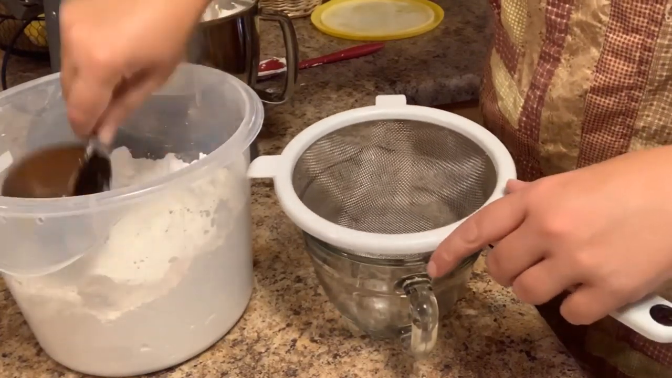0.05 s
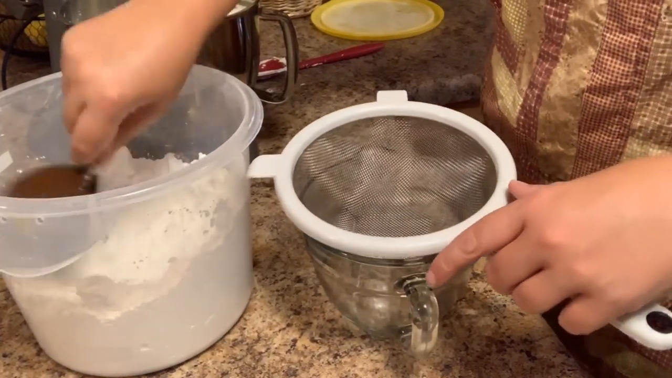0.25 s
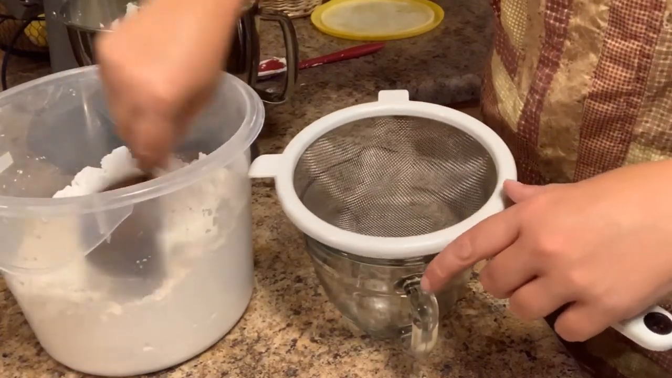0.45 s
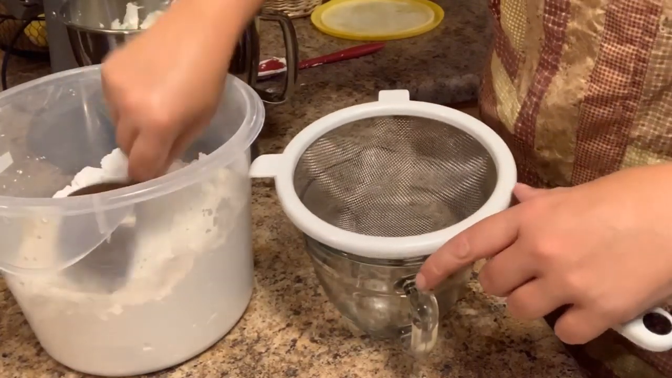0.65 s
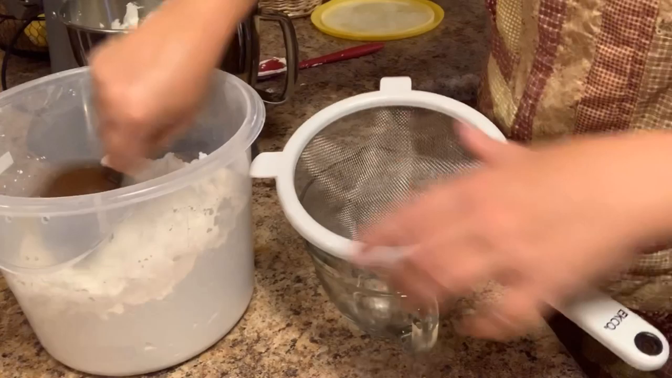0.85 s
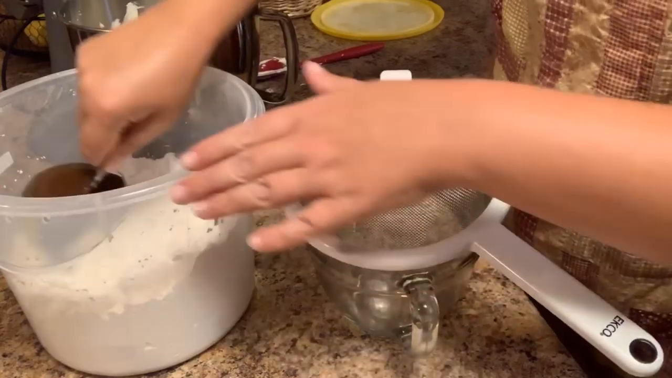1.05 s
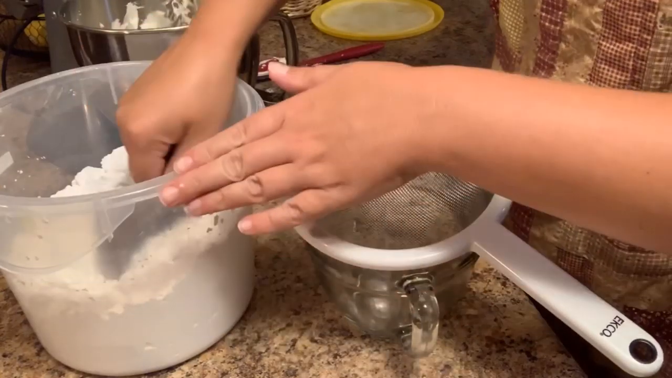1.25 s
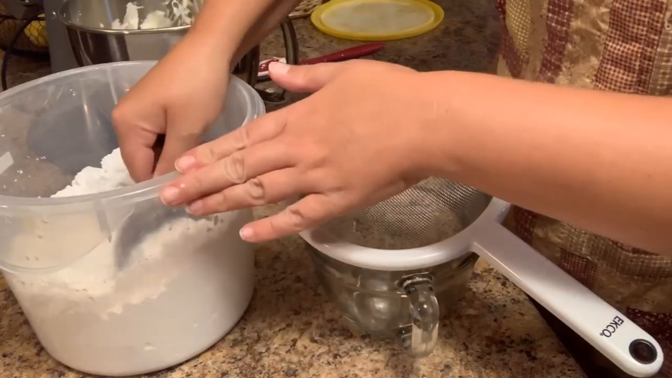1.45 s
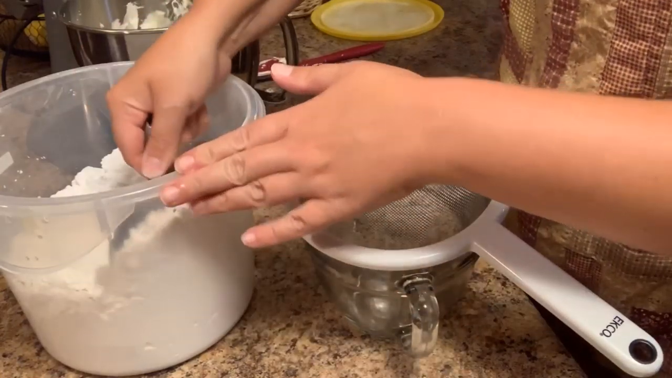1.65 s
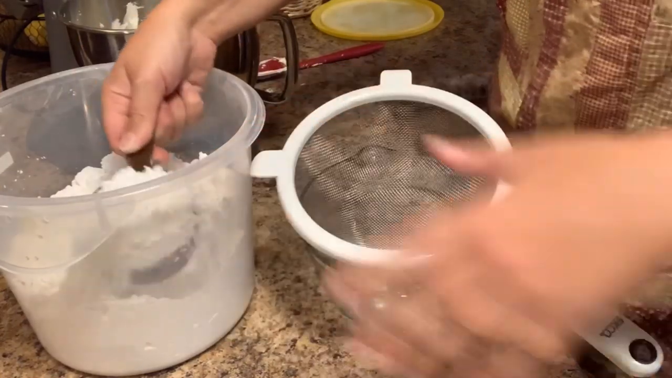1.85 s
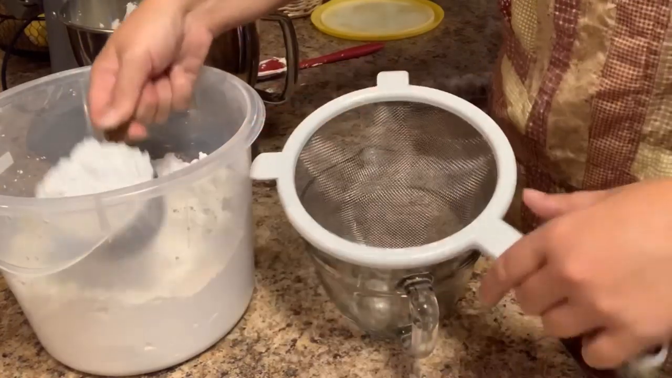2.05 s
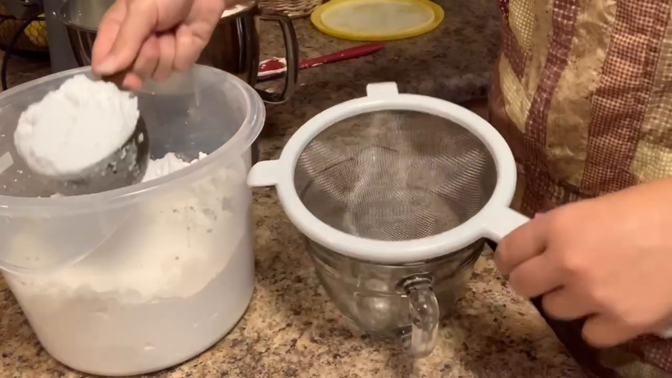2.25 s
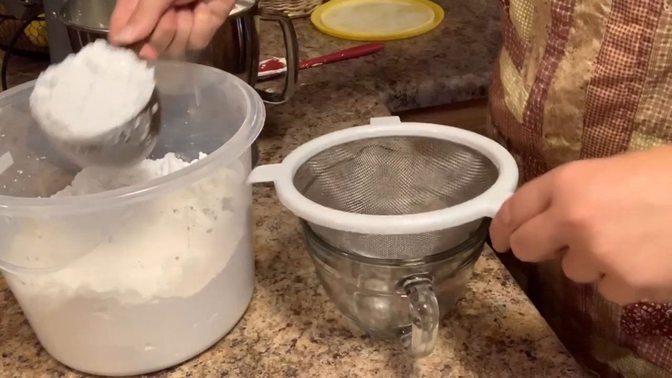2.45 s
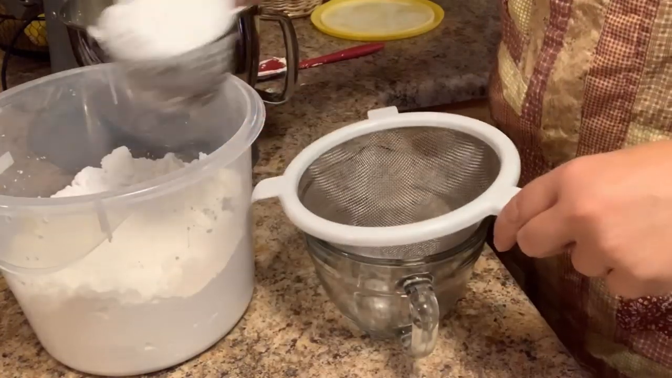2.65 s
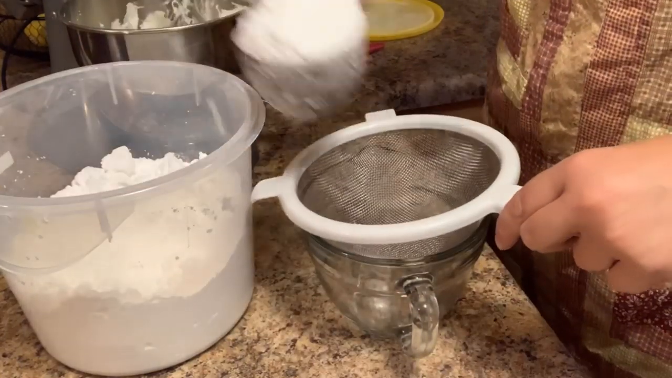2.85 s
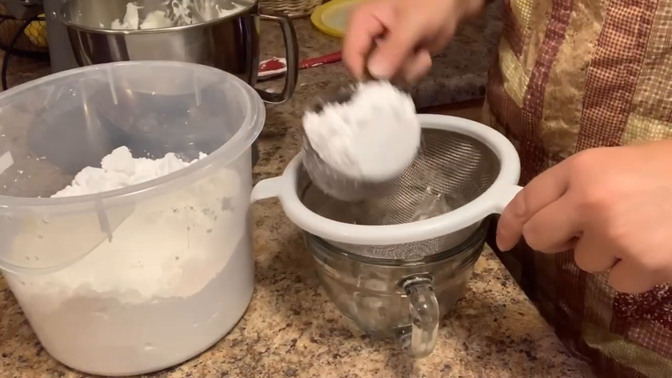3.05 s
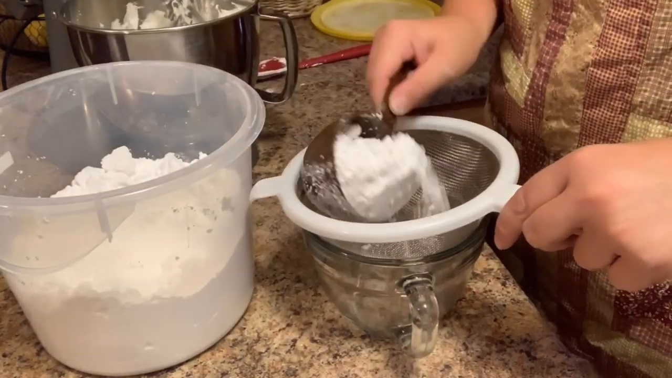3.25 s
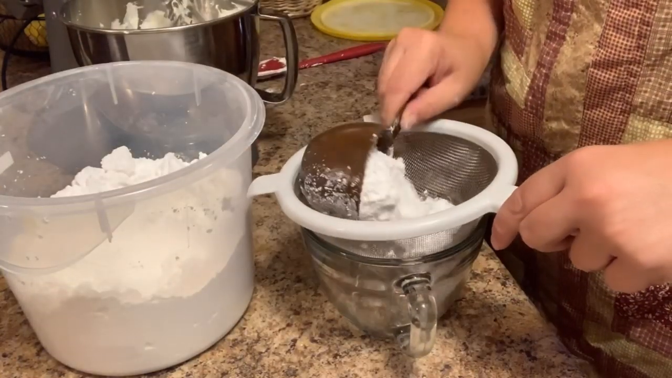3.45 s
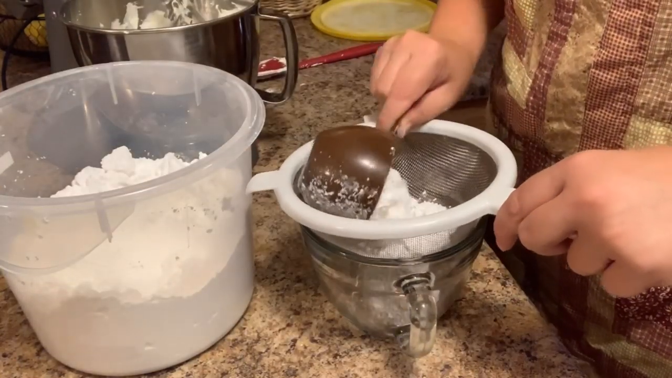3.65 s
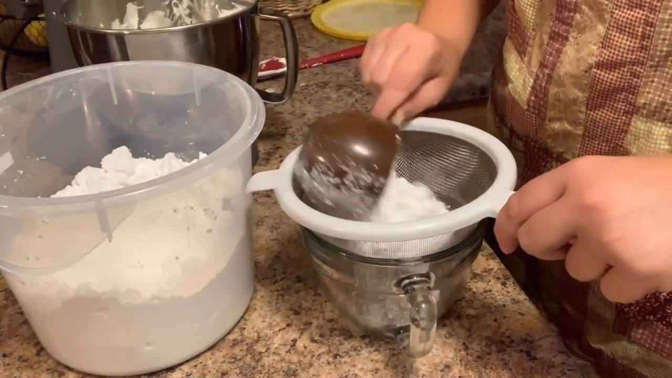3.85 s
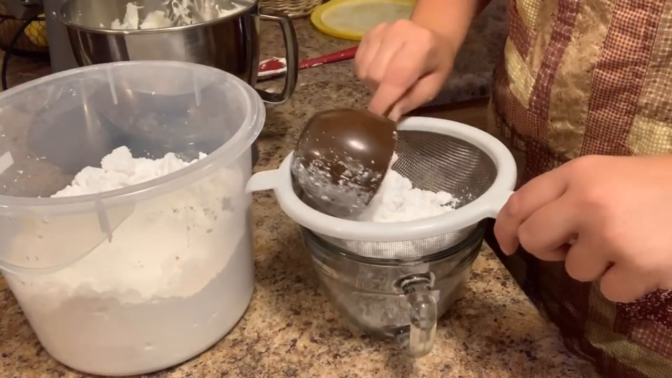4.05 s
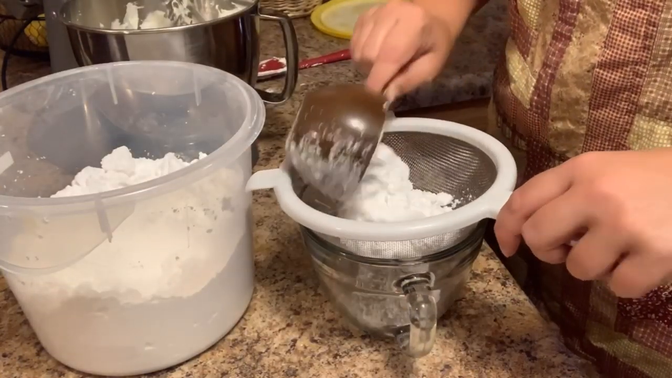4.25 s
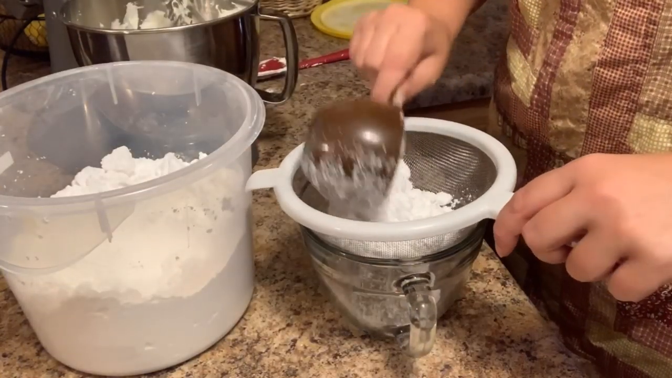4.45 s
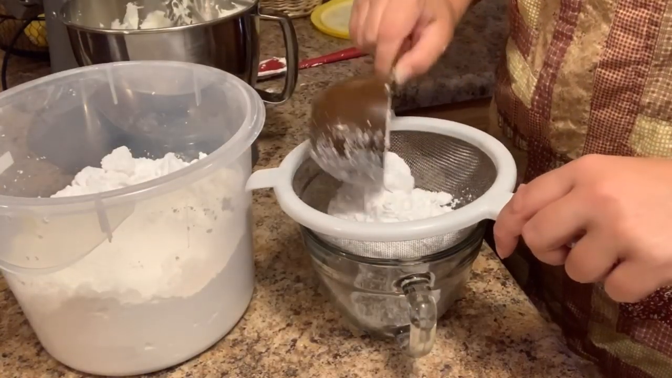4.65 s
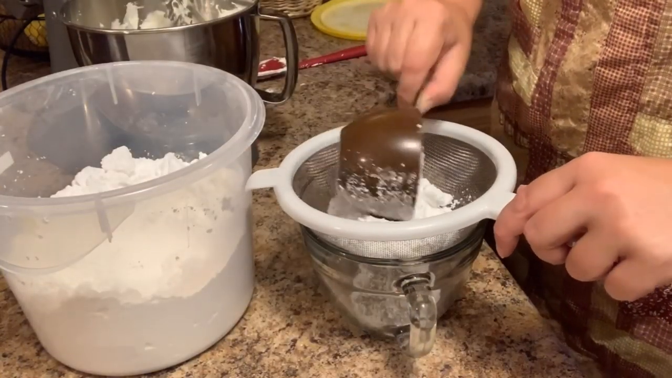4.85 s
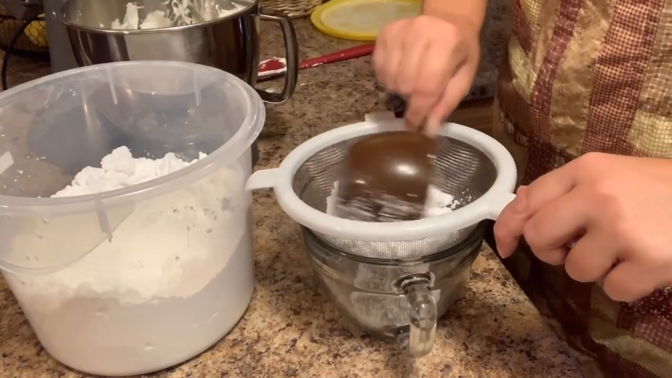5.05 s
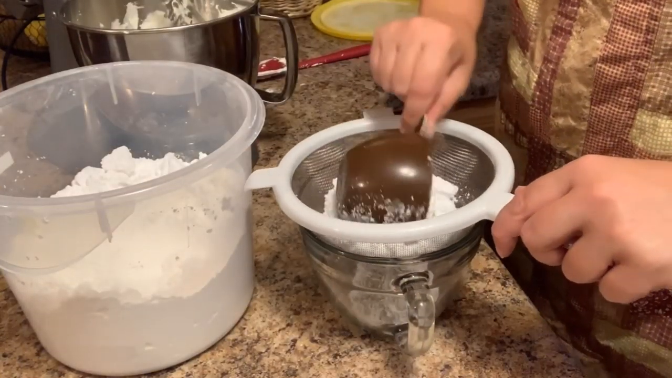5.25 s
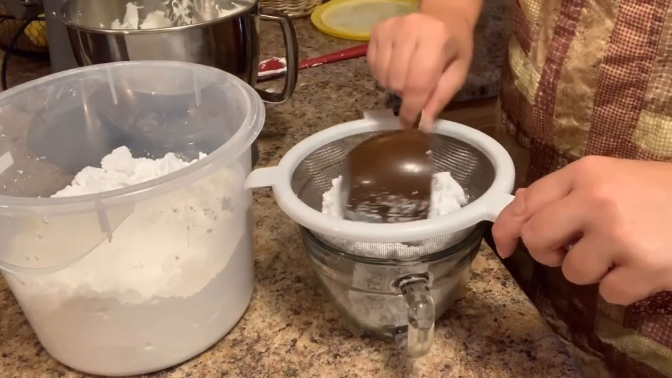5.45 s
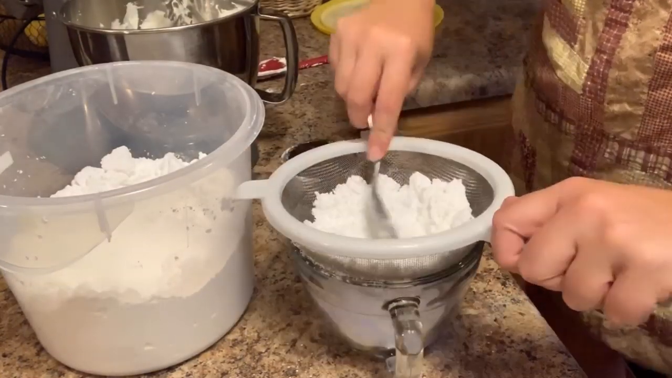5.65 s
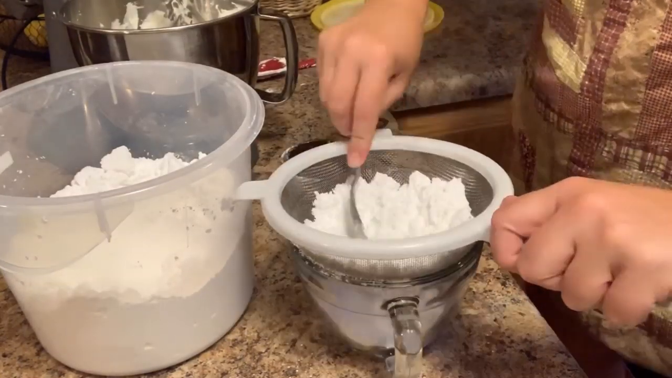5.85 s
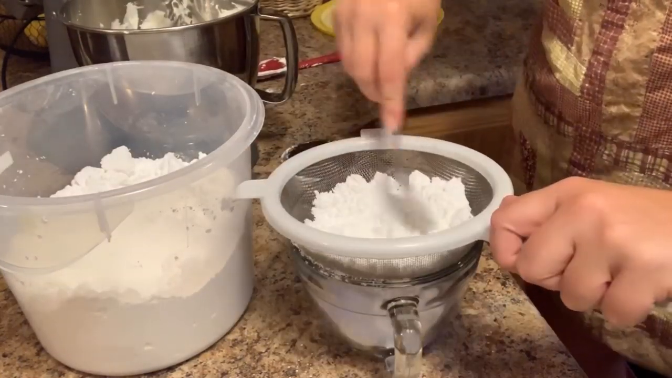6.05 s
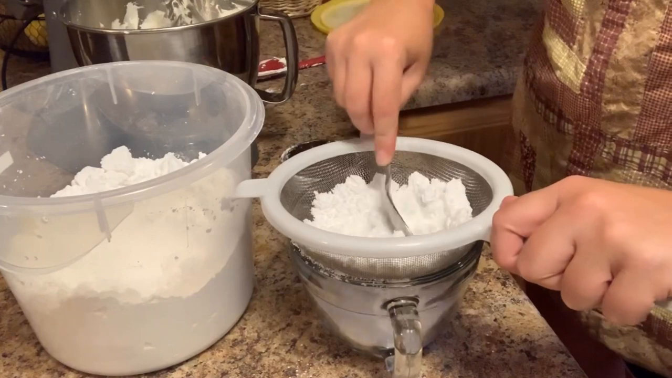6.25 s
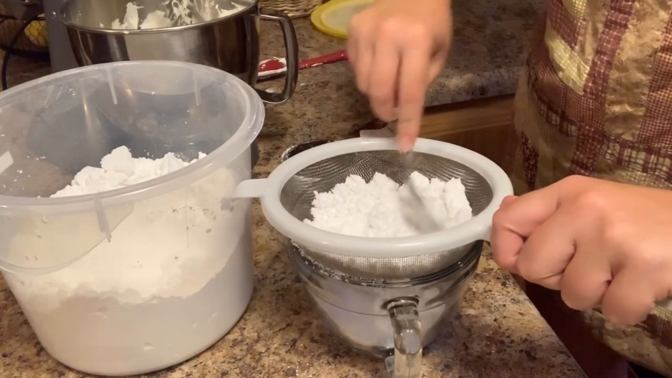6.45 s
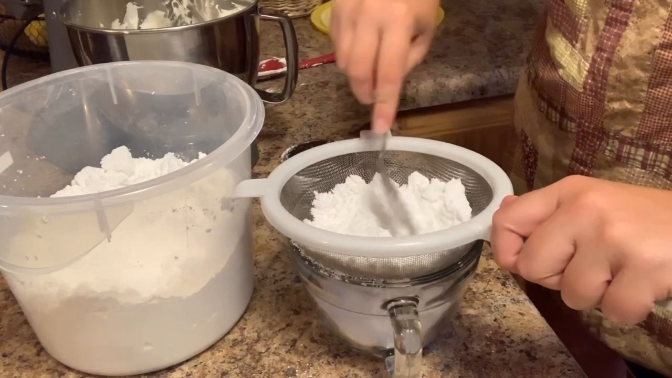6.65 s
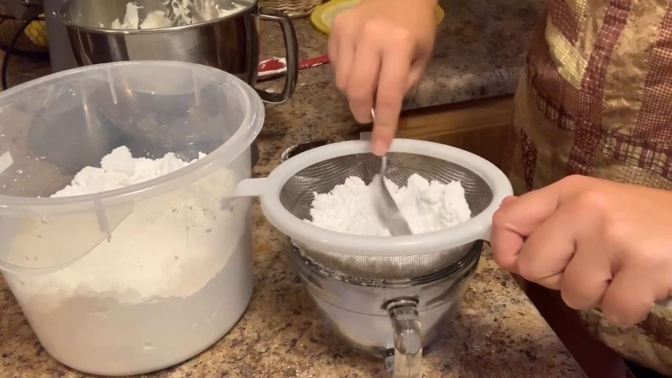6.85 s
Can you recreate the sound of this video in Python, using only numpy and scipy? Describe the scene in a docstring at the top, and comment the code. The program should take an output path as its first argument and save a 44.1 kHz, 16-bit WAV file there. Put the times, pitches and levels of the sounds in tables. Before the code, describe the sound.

Close up in a small kitchen, a plastic cup digs through powdered sugar in a plastic tub with hissing, scuffing strokes and dull bumps. It lifts, then lands on a wire sieve over a glass bowl with one loud knock. Quiet settling and faint taps follow, then firmer knocks and brisk spoon scrapes across the mesh. A faint appliance hum lies behind.

```python
"""First a low rumble and a faint hiss: a plastic cup is already digging powdered sugar out of a tub.
Then it dumps into a wire sieve on a glass bowl, and a spoon works it through the mesh. Heard close in
a small kitchen, in stereo: filtered random slips make the hiss, scuff and rasp; slips and knocks ring
tub and sieve modes, sliding friction makes the glass sing faintly, noise bursts make dry ticks. Behind
them lie an appliance hum (a wavering sine), steady air noise and a dull tail off the walls."""
import sys
import numpy as np
from scipy import signal
from scipy.fft import rfft, irfft, next_fast_len
from scipy.io import wavfile

SR = 44100
rng = np.random.default_rng(int(sys.argv[2]) if len(sys.argv) > 2 else 0)


def wav_out(sig):
    """Save sig, one row per channel (or a flat mono array), as 16-bit PCM at SR to the path in sys.argv[1]."""
    wavfile.write(sys.argv[1], SR, np.round(np.clip(np.atleast_2d(sig).T, -1, 1) * 32767).astype(np.int16))


N = 305017  # length in samples

# Strokes of cup, then spoon, through the powder: start t/s, swell t/s, hold t/s,
# powder hiss level/dB, edge scuff level/dB, shell rasp level/dB, body rumble level/dB
STROKES = [(-0.055, 0.065, 0.028, -62, -74.5, -67, -54), (0.206, 0.0012, 0.025, -58.5, -65, -56.5, -42.5),
           (0.407, 0.0014, 0.033, -54.5, -62, -57.5, -55.5),
           (0.452, 0.026, 0.036, -55.5, -66.5, -57.5, -49.5),
           (0.68, 0.0015, 0.0054, -57, -87, -60.5, -42.5), (0.694, 0.037, 0.026, -58, -74, -57.5, -58),
           (0.856, 0.014, 0.029, -63, -70, -69, -61.5), (0.883, 0.098, 0.018, -56.5, -65.5, -56.5, -55),
           (1.056, 0.044, 0.04, -58.5, -96, -68, -68), (1.15, 0.11, 0.0068, -54.5, -71.5, -56, -59.5),
           (1.292, 0.029, 0.14, -68.5, -86, -68.5, -59.5), (1.436, 0.077, 0.42, -64, -72.5, -72.5, -71.5),
           (1.792, 0.0013, 0.062, -58, -58, -77, -68), (1.853, 0.043, 0.0046, -56, -56, -75, -58),
           (1.993, 0.053, 0.15, -84, -80, -76.5, -65.5), (2.141, 0.0066, 0.036, -65, -70.5, -61.5, -58),
           (2.168, 0.044, 0.035, -66, -75, -74, -54), (2.322, 0.021, 0.03, -68.5, -74, -71, -55.5),
           (2.378, 0.0087, 0.12, -57, -66, -65.5, -50.5), (2.607, 0.049, 0.029, -54, -63.5, -73, -45.5),
           (2.733, 0.021, 0.017, -72, -75, -71, -65), (2.904, 0.06, 0.059, -87, -92, -74, -76),
           (3.084, 0.012, 0.037, -77.5, -80, -79.5, -67.5), (3.283, 0.0012, 0.0036, -53, -65, -50, -62),
           (3.303, 0.0038, 0.0085, -59.5, -55.5, -38.5, -26.5),
           (3.365, 0.0016, 0.051, -60.5, -67, -56.5, -58), (3.448, 0.015, 0.086, -64, -67, -60, -57.5),
           (3.574, 0.017, 0.2, -79.5, -84.5, -81, -54), (3.809, 0.0023, 0.012, -67, -79, -67, -49.5),
           (3.837, 0.022, 0.034, -72.5, -85, -88, -52.5), (3.92, 0.0052, 0.089, -75, -88, -90, -56),
           (4.027, 0.0016, 0.006, -74.5, -90, -73, -59), (4.092, 0.026, 0.02, -69.5, -102, -86, -75),
           (4.19, 0.13, 0.0089, -73.5, -94, -87, -82), (4.37, 0.058, 0.037, -76, -94, -81, -58),
           (4.583, 0.03, 0.0071, -89, -95, -89, -54), (4.71, 0.024, 0.035, -83, -77, -72, -57),
           (4.771, 0.075, 0.041, -71, -80, -73, -61), (4.904, 0.067, 0.14, -68.5, -76.5, -71.5, -60.5),
           (5.092, 0.065, 0.075, -64, -78, -65.5, -56.5), (5.296, 0.0013, 0.067, -66.5, -69.5, -67, -53),
           (5.352, 0.095, 0.021, -63, -75, -56.5, -42.5), (5.442, 0.003, 0.02, -71, -79, -57, -39),
           (5.492, 0.065, 0.032, -63, -77.5, -71, -50), (5.591, 0.059, 0.081, -72, -86, -70.5, -55.5),
           (5.69, 0.0043, 0.086, -66, -81, -75, -53.5), (5.801, 0.004, 0.021, -61.5, -61.5, -58.5, -50),
           (5.937, 0.001, 0.002, -54, -68, -55, -45), (5.966, 0.018, 0.0036, -53, -56.5, -54, -43.5),
           (6.18, 0.0016, 0.041, -71, -82, -72, -51), (6.244, 0.044, 0.019, -59, -65.5, -59.5, -47.5),
           (6.321, 0.014, 0.031, -92, -93, -71, -53), (6.459, 0.041, 0.138, -68.5, -96, -75, -55),
           (6.519, 0.036, 0.047, -52, -54, -47, -41), (6.85, 0.019, 0.057, -59, -63.5, -52, -41)]
# Fade after each stroke, in dB per s: hiss, scuff, rasp, rumble
STROKE_FADES = [312, 262, 240, 216]


def strokes():
    """Four gain curves of the hands' work: hiss, scuff, rasp and rumble."""
    return efforts(STROKES, STROKE_FADES)


# Colour of the powder: f/Hz, relative level/dB per Hz
HISS_SPECTRUM = [(2500, -18), (4000, -13), (6000, -4.5), (8000, -6.5), (10500, -3.5), (13000, -6.5),
                 (15500, -5.5)]


def powder_hiss():
    """Powder slides as a dense rain of uneven small slips, bright and clumped."""
    return coloured(grains(12000, spread_db=3, clump_db=2.5), HISS_SPECTRUM)


# Ringing modes of the plastic edge: f/Hz, level/dB, t60/s
EDGE_MODES = [(1350, -8, 0.0062), (1646, 0, 0.0044), (1815, 0, 0.0078), (2133, -1, 0.0081),
              (2447, -4, 0.014), (3000, -2.5, 0.0067), (3606, -3, 0.01), (3900, 0.5, 0.0038),
              (4500, -2, 0.0064)]


def edge_scuff(slips):
    """Slips ring the edge; as the contact wanders, now one mode stands out, now another."""
    total = np.zeros(N)
    for k, (hz, db, t60) in enumerate(EDGE_MODES):
        wandering = from_db(db + 3.0 * drift(4.5))
        total += (-1) ** k * wandering * ring(slips, hz, t60)
    return rms_one(total)


# Colour of the rasping shell: f/Hz, relative level/dB per Hz
RASP_SPECTRUM = [(300, 2.5), (520, 2.5), (750, 1), (1050, 1.5), (1400, -3), (1900, -10), (2600, -53)]


def shell_rasp(slips):
    """The same slips as the scuff, heard through the duller shell."""
    return coloured(slips, RASP_SPECTRUM)


# Ringing modes of the tub: f/Hz, level/dB, free t60/s
TUB_MODES = [(51, -12.5, 0.29), (82.5, -5.5, 0.16), (120.8, -2, 0.2), (194.4, 0, 0.091), (267, -4.5, 0.14),
             (350, -2, 0.085), (426, -5, 0.2), (480, -16, 0.3), (770, -43, .15), (822, -17, 0.092),
             (1262, -10, 0.15)]
# Ringing modes of the sieve on its bowl: f/Hz, level/dB, free t60/s
SIEVE_MODES = [(84, -14, 0.44), (141, -5.5, 0.4), (168.8, 1, 0.32), (198.1, -1, 0.34), (241.4, -7.5, 0.17),
               (282.4, -8, 0.26), (357, -4.5, 0.22), (459.8, -6.5, 0.23), (510, -2.5, 0.11),
               (612, -7, 0.11), (661, -14, 0.2), (884, -13.5, 0.15), (1025, -24.5, 0.084),
               (1170, -18.5, 0.058), (1286, -33, 0.12), (1558, -29, 0.1), (1656, -32, 0.19),
               (1786, -40, 0.2), (2050, -37, 0.2), (2720, -45, 0.065), (3300, -45, 0.045)]
TUB_UNTIL_S = 2.05  # the work moves from tub to sieve


def body_rumble(tub_tilt_db, sieve_tilt_db):
    """Soft slips shake the hand-damped low modes of the tub, later of the sieve; tilts in dB per octave."""
    slips = grains(1500, spread_db=1.7, clump_db=2.5)

    def shaken(modes, tilt_db):
        """Ten lowest modes under the slips, rms 1; the hand halves the ring time."""
        total = np.zeros(N)
        for k, (hz, db, t60) in enumerate(modes[:10]):
            strength = from_db(db + tilt_db * np.log2(hz / 200))
            total += (-1) ** k * strength * ring(slips, hz, 0.5 * t60)
        return rms_one(total)

    at_tub = np.arange(N) < TUB_UNTIL_S * SR
    return np.where(at_tub, shaken(TUB_MODES, tub_tilt_db), shaken(SIEVE_MODES, sieve_tilt_db))


# Knocks on tub or sieve: t/s, peak level/dB, hardness in dB per octave, damping factor on t60
KNOCKS = [(0.209, -36, -1.5, 0.74), (0.696, -42.5, -5.5, 0.34), (.975, -47, 11, 0.76),
          (1.25, -46.5, 2, 0.44), (2.141, -41.5, 2.5, 0.45), (2.657, -41, -12, 0.53),
          (3.303, -18.5, 4.5, 0.48), (4.406, -67, 6, 0.57), (4.609, -54, -11, 0.72),
          (4.757, -51.5, -4, 0.21), (5.297, -36.5, 0, 0.52), (5.444, -30, 2.5, 0.37),
          (5.544, -38, 0.5, 0.33), (5.696, -41, 0, 0.52), (5.794, -46, 3, 1), (5.938, -34.5, 4.5, 0.33),
          (5.987, -44, 7, 0.8), (6.19, -53.5, 8, 0.68), (6.542, -37.5, 15, 0.83), (6.632, -37, -2.5, 0.82),
          (6.878, -40, 1, 0.72)]


def knocks():
    """Each knock is a short uneven run of contacts into the modes of what it strikes."""
    out = np.zeros(N)
    t = np.arange(SR // 2) / SR
    for s, db, hard_db, damping in KNOCKS:
        draw = rng.normal(0, 1, 500)
        modes = TUB_MODES if s < TUB_UNTIL_S else SIEVE_MODES
        hz, mode_db, t60 = np.transpose(modes)[..., None]
        strength = from_db(mode_db + 2.0 * draw[:len(hz), None] + hard_db * np.log2(hz / 300))
        swell = 1 - np.exp(-t * hz * 1.3)  # low modes swell more slowly
        decay = from_db(-60 * t / (t60 * damping))
        sound = np.sum(strength * swell * np.sin(2 * np.pi * hz * t) * decay, axis=0)
        contacts = 0.031 * draw ** 3 * np.exp(-t[:500] / 0.0035)
        contacts[0] = 1  # the first contact leads
        sound = signal.fftconvolve(sound, contacts)[:len(t)]
        add_at(out, s, from_db(db) * sound / np.abs(sound).max())
    return out


# Dry ticks where an edge bites or a lump breaks: t/s, level/dB (11 dB above the burst's
# undecayed rms), centre f/Hz, t60/s
TICKS = [(0.2081, -36, 1240, 0.024), (0.407, -45.5, 1000, 0.22), (0.68, -51, 1080, 0.22),
         (0.7218, -49, 1190, 0.089), (1.1524, -50.5, 1790, 0.062), (1.792, -38, 1750, 0.21),
         (1.9112, -34.5, 2210, 0.089), (2.2103, -51.5, 2540, 0.062), (2.3391, -67, 1690, 0.076),
         (2.378, -51.5, 7850, 0.06), (2.6258, -56, 5430, 0.097), (2.7788, -61, 1000, 0.042),
         (3.103, -56, 1070, 0.06), (3.2851, -50, 1030, 0.047), (3.304, -48, 2100, 0.063),
         (3.3145, -37, 9150, 0.027), (3.81, -52, 990, 0.094), (3.92, -52.5, 1010, 0.079),
         (4.0275, -53, 990, 0.055), (5.0294, -54, 1010, 0.066), (5.0649, -47.5, 1060, 0.082),
         (5.1554, -61, 1010, 0.084), (5.3053, -42, 1040, 0.039), (5.5192, -46.5, 1750, 0.1),
         (5.8018, -40, 1050, 0.067), (5.9366, -36, 1010, 0.12), (5.9885, -24, 970, 0.054),
         (6.1788, -56, 1670, 0.05), (6.2732, -44.5, 1010, 0.22), (6.5307, -67, 1570, 0.026),
         (6.8664, -53, 1100, 0.075)]


def ticks():
    """A burst of noise with a hard start, dying fast, broad around its centre."""
    out = np.zeros(N)
    t = np.arange(SR // 4) / SR
    for s, db, hz, t60 in TICKS:
        band = [0.78 * hz, min(1.12 * hz, 0.45 * SR)]
        b, a = signal.butter(1, band, "band", fs=SR)
        burst = rms_one(signal.lfilter(b, a, rng.standard_normal(len(t))))
        add_at(out, s, from_db(db - 11.0) * burst * from_db(-60 * t / t60))
    return out


# Sieve frame sliding on the glass rim: start t/s, swell t/s, hold t/s,
# friction level/dB into the low, middle and high ring
SLIDES = [(2.15, 0.056, 0.053, -96, -103, -118), (2.356, 0.046, 0.13, -101, -102, -106),
          (2.61, 0.02, 0.058, -101, -99, -118), (3.078, .03, 0.041, -102, -112, -125),
          (3.34, .03, 0.12, -100, -113, -106), (3.47, .03, 0.083, -95, -104, -109),
          (3.646, 0.022, 0.045, -103, -116, -125), (3.802, .02, 0.12, -106, -125, -125),
          (5.82, .01, .03, -96, -114, -116)]
SLIDE_FADE_DB_PER_S = 206
# Glass modes in three groups, low, middle, high: f/Hz, level/dB, t60/s
GLASS_MODES = [
    [(925.3, 1.5, 0.3), (975, -1.5, 0.26)],
    [(2410, 1.5, 0.36), (2460, -0.5, 0.32)],
    [(4440, 9, 0.092)],
]


def glass():
    """Friction on the rim keeps the bowl's long modes singing during each slide."""
    slips = grains(1500, spread_db=3.5, clump_db=3.0)
    frictions = efforts(SLIDES, np.full(len(GLASS_MODES), SLIDE_FADE_DB_PER_S))
    total = np.zeros(N)
    for modes, friction in zip(GLASS_MODES, frictions):
        for hz, db, t60 in modes:
            total += from_db(db) * ring(friction * slips, hz, t60)
    return total


# Near reflections, left-right likeness: f/Hz, likeness (1 = same on both sides, 0 = unrelated)
LIKENESS = [(30, .9), (60, 0.97), (150, 0.985), (300, 0.965), (600, .89), (1200, 0.55), (2000, 0.1),
            (7000, 0), (10000, 0.3)]
NEAR_T60_S = 0.055  # reflections off counter and pots


def spread(x):
    """Near reflections differ between the sides, their mix wanders slowly: bass alike, higher up less so."""
    size = next_fast_len(N, True)
    turn = 2.53 * drift(3.32)  # radians
    alike = on_bins(LIKENESS, size)
    near = np.cos(turn) * echoes(x, NEAR_T60_S) + np.sin(turn) * echoes(x, NEAR_T60_S)
    mid = rfft(x, size) * np.sqrt((1 + alike) / 2)
    side = rfft(near, size) * np.sqrt((1 - alike) / 2)
    return irfft(np.array([mid + side, mid - side]), size)[:, :N]


KITCHEN_T60_S, KITCHEN_DB, WALL_CUT_HZ = 0.3, -11, 12000


def kitchen(x):
    """The walls return a dull tail."""
    b, a = signal.butter(1, WALL_CUT_HZ, fs=SR)
    return signal.lfilter(b, a, echoes(x, KITCHEN_T60_S))


HUM_HZ, HUM_RMS_DB, HUM_WAVER_DB = 117.2, -65, 2  # middle pitch, middle level, spread of level


def hum():
    """An appliance hums at about twice the mains, wavering in level and phase."""
    level = from_db(HUM_RMS_DB + 3 + HUM_WAVER_DB * drift(1.8))  # +3 dB: rms to sine peak
    phase = 2 * np.pi * HUM_HZ * np.arange(N) / SR + 0.55 * drift(2.3)
    return level * np.sin(phase)


# Colour of the room air: f/Hz, relative level/dB per Hz
AIR_SPECTRUM = [(12, -41), (20, -11), (65, -3.5), (122, -4.5), (307, -20.5), (508, -17.5), (2170, -38.5),
                (6880, -44), (8000, -46), (10400, -43), (17600, -120)]
AIR_RMS_DB = -63.5


def room_air():
    """Steady noise of the room, heaviest in the bass."""
    return from_db(AIR_RMS_DB) * coloured(rng.standard_normal(N), AIR_SPECTRUM)


def from_db(db):
    """Decibels to amplitude."""
    return 10 ** (np.asarray(db) / 20)


def rms_one(x):
    """Scale to rms 1."""
    return x / np.sqrt(np.mean(x ** 2) + 1e-20)


def add_at(out, s, sound):
    """Mix a sound in at s seconds, cut at the end of the scene."""
    at = round(s * SR)
    out[at:at + len(sound)] += sound[:N - at]


TOUCH_DB = -15.5  # a stroke sets in at this level relative to full strength
ONSET_SHARE = 0.21  # part of the swell over which the contact closes


def efforts(rows, fades):
    """Rows swell, hold and fade, adding in power where they overlap; one gain curve per level column."""
    power = np.zeros((len(fades), N))
    for s, swell, hold, *db in rows:
        first = max(round(s * SR), 0)
        last = min(round((s + swell + hold + 0.4) * SR), N)  # room for the fade
        t = np.arange(first, last) / SR - s
        rise_db = TOUCH_DB * np.clip(1 - t / swell, 0, 1)
        fall_db = np.outer(fades, np.maximum(t - swell - hold, 0))
        closing = np.minimum(t / (ONSET_SHARE * swell), 1)
        gain = from_db(np.array(db)[:, None] + rise_db - fall_db) * closing
        power[:, first:last] += gain ** 2
    return np.sqrt(power)


def grains(per_s, spread_db, clump_db):
    """Random slips of uneven size that come in clumps; rms 1."""
    sizes = from_db(spread_db * np.minimum(rng.exponential(1, N), 5)) * rng.choice([-1, 1], N)
    happens = rng.random(N) < per_s / SR
    return rms_one(sizes * happens * from_db(clump_db * drift(21.5)))


def ring(push, hz, t60):
    """A two-pole resonator: a unit click sets a sine of height 1 ringing."""
    r, w = from_db(-60 / (t60 * SR)), 2 * np.pi * hz / SR
    return signal.lfilter([0, np.sin(w)], [1, -2 * r * np.cos(w), r * r], push + 1e-18)


def drift(rate):
    """Slow random wander of rms about 1: noise through two equal poles at rate Hz."""
    r = np.exp(-2 * np.pi * rate * 40 / SR)  # one step every 40 samples
    noise = rng.standard_normal(N // 40 + 2002)
    slow = signal.lfilter([1], [1, -2 * r, r * r], noise)[2000:]
    return np.interp(np.arange(N) / 40, np.arange(len(slow)), rms_one(slow))


def on_bins(points, size):
    """A (f/Hz, value) table read on the bins of a real FFT, along log frequency."""
    hz = np.maximum(np.arange(size // 2 + 1) * SR / size, 1)
    table_hz, values = np.array(points).T
    return np.interp(np.log(hz), np.log(table_hz), values)


def coloured(x, spectrum):
    """x through a (f/Hz, level/dB) spectrum, rms 1."""
    size = next_fast_len(N, True)
    return rms_one(irfft(rfft(x, size) * from_db(on_bins(spectrum, size)), size)[:N])


def echoes(x, t60):
    """Dense reflections: dying noise of unit energy."""
    t = np.arange(round(t60 * SR)) / SR
    tail = rng.standard_normal(len(t)) * from_db(-60 * t / t60)
    return signal.fftconvolve(x, tail / np.sqrt(np.sum(tail ** 2)))[:N]


BODY_LAG_S = 0.008  # the body answers a stroke late


def scene():
    """All sources on the counter, the room behind them."""
    hiss, edge, shell, body = strokes()
    crunch = grains(2500, spread_db=0.5, clump_db=1.5)  # scuff and rasp share the same slips
    late_body = np.pad(body, (round(BODY_LAG_S * SR), 0), "edge")[:N]
    near = hiss * powder_hiss() + edge * edge_scuff(crunch) + shell * shell_rasp(crunch)
    near += late_body * body_rumble(tub_tilt_db=-5.0, sieve_tilt_db=-6.0)
    near += knocks() + ticks() + glass()
    return spread(near + from_db(KITCHEN_DB) * kitchen(near) + hum() + room_air())


TREBLE_FROM_HZ, TREBLE_LAG_S = 7670, 0.0004436
TOP_STOP_HZ = 16400  # from here up the sound is at least 70 dB down


def record(dry):
    """The recorder widens the treble: up there the right is mostly the left, inverted and slightly late;
    the top is cut."""
    size = next_fast_len(N + 1000, True)
    hz = np.arange(size // 2 + 1) * SR / size
    left, right = rfft(dry, size)
    share = 0.98 / (1 + (TREBLE_FROM_HZ / (hz + 1)) ** 12)  # power the right side takes from the left
    late_left = left * np.exp(-2j * np.pi * hz * TREBLE_LAG_S)
    right = np.sqrt(1 - share) * right - np.sqrt(share) * late_left
    both = irfft(np.array([left, right]), size)[:, :N]
    return signal.sosfilt(signal.cheby2(14, 70, TOP_STOP_HZ, fs=SR, output="sos"), both)


dry = scene()
out = record(dry)
wav_out(out)
```